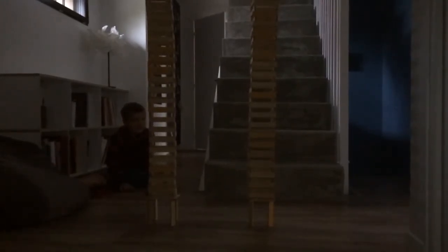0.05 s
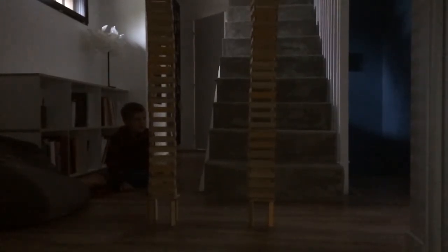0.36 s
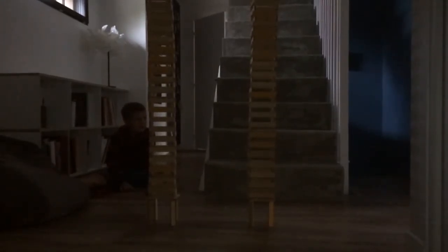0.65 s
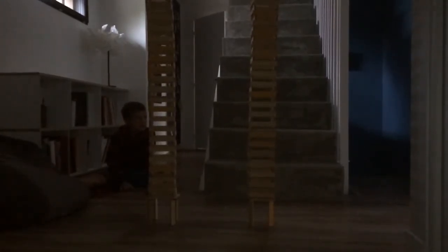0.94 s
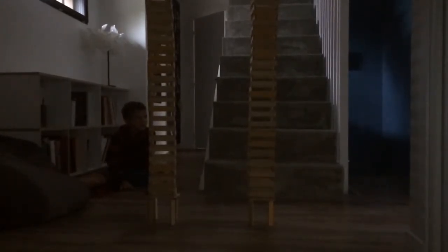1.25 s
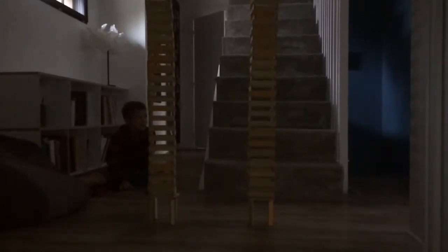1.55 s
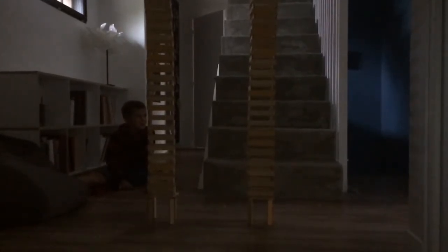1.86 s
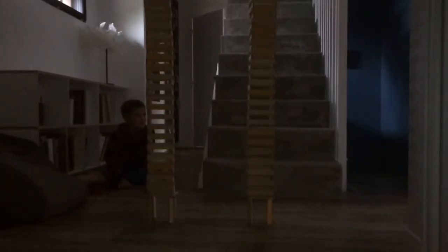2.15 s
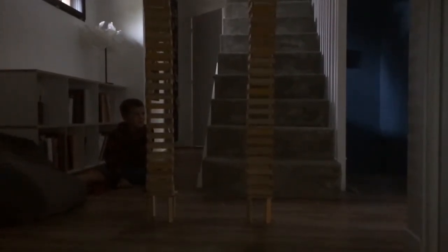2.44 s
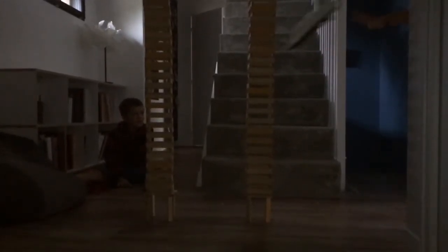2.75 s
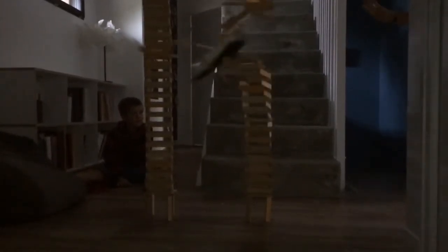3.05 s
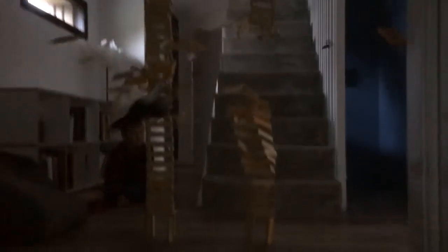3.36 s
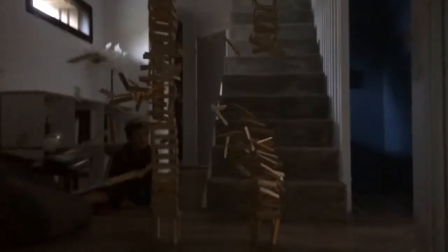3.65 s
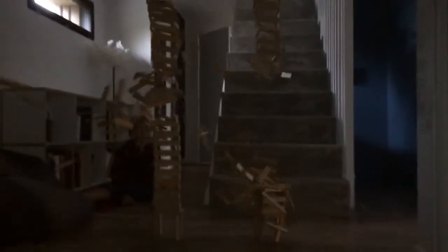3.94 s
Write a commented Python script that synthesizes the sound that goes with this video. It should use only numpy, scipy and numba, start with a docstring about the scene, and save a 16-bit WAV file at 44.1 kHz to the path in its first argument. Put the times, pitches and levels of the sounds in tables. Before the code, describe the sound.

Towers of wooden planks collapse with a loud clatter in a quiet room.

```python
"""A quiet living room, with a soft hiss, a hum and a low rumble. Clothes rustle, something is thrown,
and a puff of air buffets the microphone. The thrown thing thumps into tall towers of small wooden planks.
The planks clack against each other, each ringing briefly, and rain on the wooden floor.
A narrow-band recorder with a limiter holds the clatter down."""
import sys
import numpy as np
from scipy import signal
from scipy.fft import rfft, irfft
from scipy.io import wavfile
from scipy.ndimage import uniform_filter1d
from numba import njit

SR = 44100
rng = np.random.default_rng(int(sys.argv[2]) if len(sys.argv) > 2 else 0)


def digitize_waveform(pressure):
    """Quantize a signal to 16-bit integers and store it at the path in sys.argv[1].

    Rows of a 2-D input are taken as channels; values are limited to [-1, 1].
    """
    field = np.atleast_2d(pressure).T
    bounded = np.clip(field, -1, 1)
    quanta = np.round(bounded * 32767).astype(np.int16)
    wavfile.write(sys.argv[1], SR, quanta)


N = 176400
T = np.arange(N) / SR
TAIL = T[:SR // 6]  # time axis of one short hit


def amp(db):
    """Turn decibels into a gain."""
    return 10 ** (np.asarray(db) / 20)


def curve(t, points):
    """Gain along a line through (time_s, level_db) points."""
    return amp(np.interp(t, *np.array(points).T))


def add(out, start_s, sound):
    """Mix a sound in at a given time."""
    i = int(np.clip(start_s * SR, 0, N))
    out[i:i + len(sound)] += sound[:N - i]


def colour(x, points):
    """Filter through (pitch_hz, level_db) points; white noise keeps its power."""
    hz, db = np.array(points).T
    f = np.fft.rfftfreq(16384, 1 / SR) + 1
    gain = amp(np.interp(np.log(f), np.log(hz), db)) / np.hypot(1, (f / hz[-1] / 2) ** 2)
    cepstrum = irfft(np.log(gain / np.sqrt(np.mean(gain ** 2))))
    cepstrum[1:len(f) - 1] *= 2  # folded so that nothing sounds before its hit
    cepstrum[len(f):] = 0
    return signal.fftconvolve(x, irfft(np.exp(rfft(cepstrum))))[:N]


def noise(points):
    """Steady noise of a given colour."""
    return colour(rng.standard_normal(N), points)


def drift(per_s):
    """Slow random wandering, about 1 either way."""
    return np.interp(T * per_s, np.arange(256), rng.standard_normal(256))


def swells(rows, points):
    """Noise that rises, holds and fades once for each row."""
    power = sum((amp(db) * np.interp(T, start + np.cumsum([0, rise, hold, fade]), [0, 1, 1, 0])) ** 2
                for start, rise, hold, fade, db in rows)
    return np.sqrt(power) * noise(points)


def bursts(times, sizes, points, decay_s):
    """Each contact is a rough push that dies within milliseconds."""
    out = np.zeros(N)
    for start, size in zip(times, sizes):
        add(out, start, size * np.exp(-TAIL / decay_s) * rng.standard_normal(len(TAIL)))
    return colour(out, points)


def shower(force, per_s, crash_s=3.131, scatter_db=3.5, count=400):
    """Times and sizes of random contacts once the towers give way."""
    times = crash_s + (np.arange(count) + 2 * rng.random(count)) / per_s
    sizes = curve(times, force) * amp(scatter_db * np.clip(rng.standard_normal(count), -2, 2))
    return times[times < T[-1]], sizes[times < T[-1]]


# Colours (how much bass and treble) of the hiss and rumble: pitch_hz, level_db
HISS_COLOUR = [(47, -31.5), (80, -10.5), (112, -3), (221, -13), (248, -14), (296, -15.5), (409, -13),
               (436, -13.5), (806, -18), (1540, -20), (3800, -32.5), (4940, -63), (8360, -120)]
RUMBLE_COLOUR = [(12, -23), (25, -2.5), (38, -1.5), (52, -0.5), (72, -17), (130, -43.5)]
# How each slowly swells and sinks: time_s, level_db
HISS_SWELL = [(0, 0), (.45, .5), (.6, -0.5), (1.08, -2.5), (1.25, 0.5), (1.5, .5), (1.8, -1), (2.2, 0.5)]
RUMBLE_SWELL = [(0, -53), (.35, -54.5), (.9, -58), (1.1, -52.5), (1.3, -52.5), (1.5, -58), (2.0, -57.5),
                (2.42, -53), (2.8, -62), (4.0, -47)]
# The tones in the hum: pitch_hz, level_db
HUM_TONES = [(111, -67.5), (146, -71), (221, -84.5), (296, -76.5), (441, -78.5), (550, -77), (662, -82.5)]

def room_tone(hiss_db=-63.5, waver_db=3, drift_hz=0.89):
    """Soft hiss, a wavering appliance hum and a low rumble."""
    hiss = amp(hiss_db + .5 * drift(9)) * curve(T, HISS_SWELL) * noise([(30, -12)] + list(HISS_COLOUR))
    hum = 0
    for hz, db in HUM_TONES:
        level = np.sqrt(2) * amp(db + waver_db * drift(6.05))
        pitch_hz = hz + drift_hz * drift(6.97)
        hum += level * np.sin(2 * np.pi * np.cumsum(pitch_hz) / SR)
    return hiss + hum + curve(T, RUMBLE_SWELL) * noise(RUMBLE_COLOUR)


# Faint ticks: start_s, level_db
TICK_HITS = [(1.462, -61), (1.485, -64), (2.926, -57)]
# Their colour: pitch_hz, level_db
TICK_COLOUR = [(150, -12), (450, 7), (900, -5), (1600, -6), (2300, 1), (3100, -1), (3900, -2)]

def ticks():
    """Small dry ticks while the clothes move."""
    times, db = np.array(TICK_HITS).T
    return bursts(times, amp(db), TICK_COLOUR, decay_s=.005)


# Movements of the clothes, plus the whoosh of the thrown thing (the last swish row): start_s, rise_s, hold_s,
# fade_s, level_db
SHUFFLE_MOVES = [(1.46, 0.017, 0.027, 0.075, -62.5), (2.02, 0.039, 0.13, 0.36, -58.5),
                 (2.38, 0.036, 0.64, .1, -63), (2.91, 0.038, 0.26, 0.085, -51.5)]
SWISH_MOVES = [(1.455, .008, .035, .06, -75), (2.04, 0.053, 0.066, 0.17, -87),
               (2.38, .2, 0.049, 0.37, -59.5), (2.84, 0.094, 0.058, 0.07, -56.5),
               (3.03, 0.027, 0.049, .03, -44.5)]
FLAP_MOVES = [(2.62, 0.023, .03, .05, -61.5), (2.84, 0.055, 0.04, .05, -50.5),
              (3.03, 0.067, 0.036, .02, -42)]
# Their colours: pitch_hz, level_db
SHUFFLE_COLOUR = [(60, -19), (130, -6.5), (210, -0.5), (320, -5), (480, -6.5), (700, -20), (1500, -26.5),
                  (3500, -30)]
SWISH_COLOUR = [(150, -25.5), (400, -2), (700, 1), (1100, -5), (1700, -4), (2300, -11), (3400, -11),
                (4000, -18)]
FLAP_COLOUR = [(100, -22), (170, -8.5), (210, 8), (250, -8), (350, -25)]

def clothes():
    """Moving cloth makes dull shuffles and brighter swishes; the throw adds low flaps and the thrown thing a
    short rising whoosh just before the crash."""
    shuffles = swells(SHUFFLE_MOVES, SHUFFLE_COLOUR)
    swishes = swells(SWISH_MOVES, SWISH_COLOUR)
    return shuffles + swishes + swells(FLAP_MOVES, FLAP_COLOUR)


# Puffs of air: start_s, rise_s, hold_s, fade_s, level_db
AIR_PUFFS = [(2.83, 0.16, .1, .1, -40.5), (3.09, .06, .09, 0.035, -24), (3.25, .02, 0.057, 0.069, -40)]
# Their deep colour: pitch_hz, level_db
PUFF_COLOUR = [(12, -13), (25, 15), (45, 0), (70, -4), (130, -14), (400, -47)]

def air_puffs():
    """Air pushes on the microphone with a deep flutter."""
    return swells(AIR_PUFFS, PUFF_COLOUR)


# Bumps against the towers: start_s, relative_level_db
THUMP_HITS = [(3.136, -4.5), (3.147, 1.5), (3.17, 0.5), (3.2, 5.5), (3.219, 4.5), (3.245, 7.5)]
# Their colour: pitch_hz, level_db
THUMP_COLOUR = [(20, -7), (58, 1), (90, -1.5), (185, 3.5), (260, -4.5), (500, -29)]

def thumps(gain_db=-13.5):
    """The thrown thing bumps through the towers."""
    times, db = np.array(THUMP_HITS).T
    return bursts(times, amp(gain_db + db), THUMP_COLOUR, decay_s=0.0083)


# How hard the planks land: time_s, relative_level_db
LANDING_FORCE = [(3.13, -4.5), (3.22, 0), (3.29, 0.5), (3.45, 4.5), (3.55, 1), (3.66, 2), (3.74, -7.5),
                 (3.85, -8.5), (4.0, -12)]
# Colour of a knock on the floor: pitch_hz, level_db
FLOOR_COLOUR = [(60, -30.5), (110, -11.5), (180, 1), (235, -2), (275, -1.5), (335, 3), (420, -0.5),
                (540, -1), (800, -10), (1500, -29.5)]

def landings(gain_db=-12.5):
    """Falling planks knock dully on the floorboards."""
    times, sizes = shower(LANDING_FORCE, per_s=130)
    return bursts(times, sizes * amp(gain_db) / 2, FLOOR_COLOUR, decay_s=0.0058)


# A plank's three tones: pitch_hz, level_db, ring_s (time to fade by 60 dB)
PLANK_TONES = [(698, -2.5, 0.054), (1705, 0, 0.064), (2993, -19, 0.017)]

def plank(pitch_ratio, boosts_db):
    """A struck plank bends back and forth, ringing briefly."""
    out = 0
    for (hz, db, ring_s), boost in zip(PLANK_TONES, boosts_db):
        fade = np.exp(-np.log(1000) * TAIL / ring_s)
        out += amp(db + boost) * np.sin(2 * np.pi * hz * pitch_ratio * TAIL) * fade
    return out


# Colours of a hard and a gentle contact: pitch_hz, level_db
HARD_COLOUR = [(100, -25), (300, -6.5), (600, -2.5), (900, 2), (1300, -2.5), (1900, -2), (2300, -4.5),
               (2650, -7.5), (3150, -7), (3500, -14), (3900, -20)]
GENTLE_COLOUR = [(100, -27), (300, -7.5), (600, -0.5), (950, 2), (1400, 0.5), (1950, -4), (2400, -11.5),
                 (3300, -22), (3900, -30.5)]

def cracks(times, sizes, gentle=False):
    """Wood meets wood with a short crack, duller when the touch is gentle."""
    return bursts(times, sizes / 2, GENTLE_COLOUR if gentle else HARD_COLOUR, decay_s=0.0035)


# How hard the planks hit each other: time_s, relative_level_db
COLLAPSE_FORCE = [(3.13, -5), (3.16, -4.5), (3.21, 2), (3.27, -0.5), (3.33, 6), (3.43, -0.5), (3.48, -2),
                  (3.63, -0.5), (3.72, -6), (3.85, -9.5), (4.0, -9.5)]

def clatter(ring_db=-23.5, hard_db=-8, gentle_db=-13, soften_from_s=3.426, soften_db_per_s=27):
    """Hundreds of contacts crack and ring; the late ones are gentler, so their crack turns dull."""
    rings = np.zeros(N)
    times, sizes = shower(COLLAPSE_FORCE, per_s=260)
    for start, size, chance in zip(times, sizes, rng.standard_normal((len(times), 4))):
        # planks differ in pitch, and each contact favours other tones
        add(rings, start, size * plank(pitch_ratio=1 + 0.047 * chance[0], boosts_db=2.5 * chance[1:]))
    hardness = amp(-soften_db_per_s * np.maximum(times - soften_from_s, 0))
    softness = np.sqrt(np.clip(1 - hardness ** 2, 0, 1))
    hard = amp(hard_db) * cracks(times, sizes * hardness)
    gentle = amp(gentle_db) * cracks(times, sizes * softness, gentle=True)
    return amp(ring_db) * rings + hard + gentle


# The loudest hits, in relative levels: start_s, low_tone_db, upper_tones_db, crack_db
LOUD_HITS = [(3.131, -34, -15, -2.5), (3.143, -8, -15, 5), (3.173, -23, 9, -13), (3.186, 9, 3, -14),
             (3.204, -16, -22, 2), (3.27, 7.5, 2, -13), (3.309, -5, 3, -8), (3.356, -7, 3.5, -8),
             (3.383, 10.5, -6, -6), (3.412, 5, 8.5, -5), (3.431, 2.5, 9, 7.5), (3.445, 9.5, -4, 5),
             (3.469, 8, -18, -28), (3.481, -6, -3.5, -3), (3.498, -4, -1.5, 0), (3.528, 8.5, -7, 3),
             (3.547, 4, -10, -21), (3.569, -6, -24, -8.5), (3.605, -0.5, -2, -16), (3.623, 9, 1.5, -19),
             (3.661, 4, -18, -19), (3.703, 3.5, -3, -21), (3.724, -1.5, -8, -26), (3.740, -8.5, -11, -11.5),
             (3.763, -6, -2, -21), (3.786, 1, -25, -12), (3.808, -13, -7, -18), (3.829, 0.5, -20, -7.5),
             (3.841, -7, -7, -7), (3.867, -1, -13.5, -24), (3.905, -4, -7, -17), (3.974, -2.5, -15, -16)]

def strikes(ring_gain_db=-12, crack_gain_db=-3.5):
    """The hardest blows between planks stand out of the clatter."""
    rings = np.zeros(N)
    for (start, low, upper, _), chance in zip(LOUD_HITS, rng.standard_normal(len(LOUD_HITS))):
        add(rings, start, plank(pitch_ratio=1 + 0.034 * chance, boosts_db=(low, upper, upper)))
    times, _, _, crack_db = np.array(LOUD_HITS).T
    return amp(ring_gain_db) * rings + cracks(times, amp(crack_gain_db + crack_db))


def room_echo(x, ring_s=0.48, gap_s=.004, echo_db=1.5, places=6, places_per_s=40):
    """Contacts come from ever-changing places in the room, each with its own short, dense echo."""
    t = T[:SR]
    fade = np.exp(-np.log(1000) * t / ring_s) * (t > gap_s)
    place = T * places_per_s % places
    echo = 0
    for k in range(places):
        distance = np.abs((place - k + places / 2) % places - places / 2)
        share = np.sin(np.pi / 2 * np.maximum(1 - distance, 0))
        tail = rng.standard_normal(SR) * fade
        echo += signal.fftconvolve(x * share, tail / np.linalg.norm(tail))[:N]
    return x + amp(echo_db) * echo


def scene(low_cut_hz=94):
    """The quiet room, the throw, then the collapse."""
    throw = clothes() + air_puffs()
    wood = room_echo(strikes() + clatter() + landings())
    # small planks give off no deep bass
    wood = signal.sosfilt(signal.butter(4, low_cut_hz, "high", fs=SR, output="sos"), wood)
    return (room_tone() + throw + ticks() + thumps() + wood)[None]


@njit
def follow_peaks(x, rise_s, fall_s):
    """Track how loud the peaks are from moment to moment."""
    out, level = np.empty(len(x)), 0.
    for i in range(len(x)):
        level += (abs(x[i]) - level) / (SR * (rise_s if abs(x[i]) > level else fall_s))
        out[i] = level
    return out


def record(dry, limit_db=-5.5, band_hz=3830, ceiling_db=-2.5, top_hz=15200):
    """The recorder turns loud moments down, cuts the treble and rounds off the peaks."""
    x = dry[0]
    excess = np.maximum(follow_peaks(x, rise_s=.001, fall_s=0.079) / amp(limit_db), 1)
    x = x / uniform_filter1d(excess, 441)  # smoothed over 10 ms
    x = signal.sosfilt(signal.ellip(10, .3, 70, band_hz, fs=SR, output="sos"), x)
    x = amp(ceiling_db) * np.tanh(x / amp(ceiling_db))
    # joining every fourth sample with straight lines mirrors a faint fizz into the treble
    x = np.interp(T, T[::4], x[::4])
    return signal.sosfilt(signal.ellip(8, .2, 70, top_hz, fs=SR, output="sos"), x)[None]


dry = scene()
out = record(dry)
digitize_waveform(out)
```